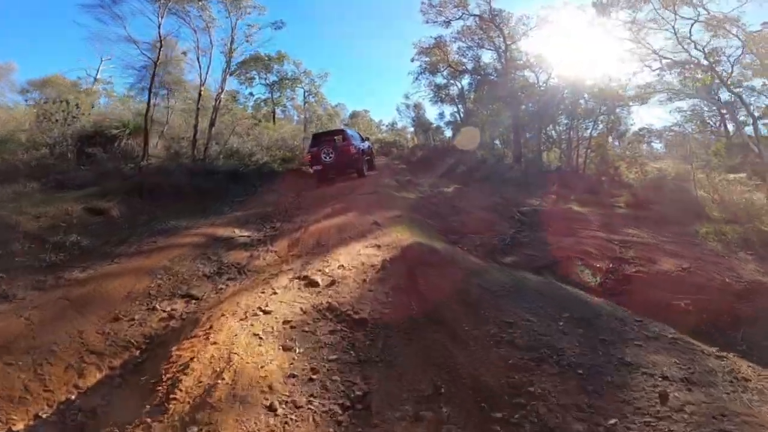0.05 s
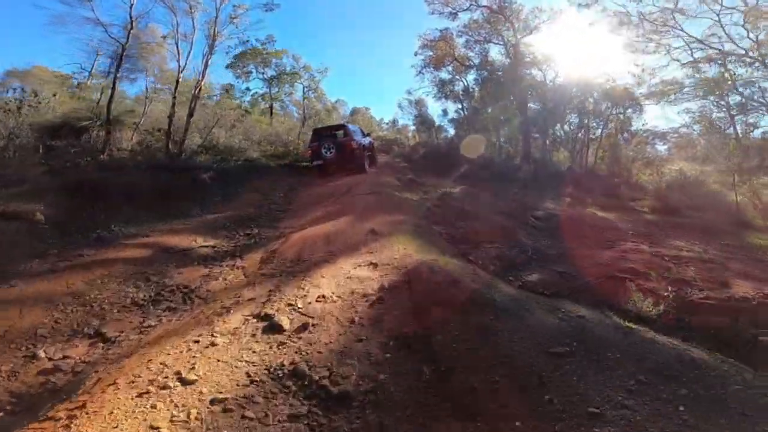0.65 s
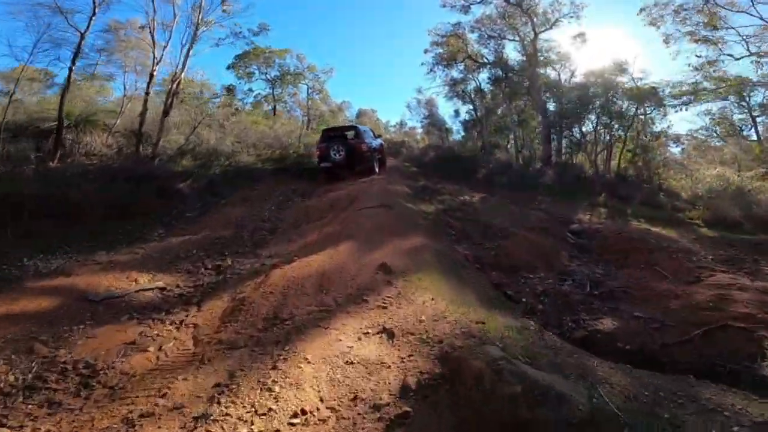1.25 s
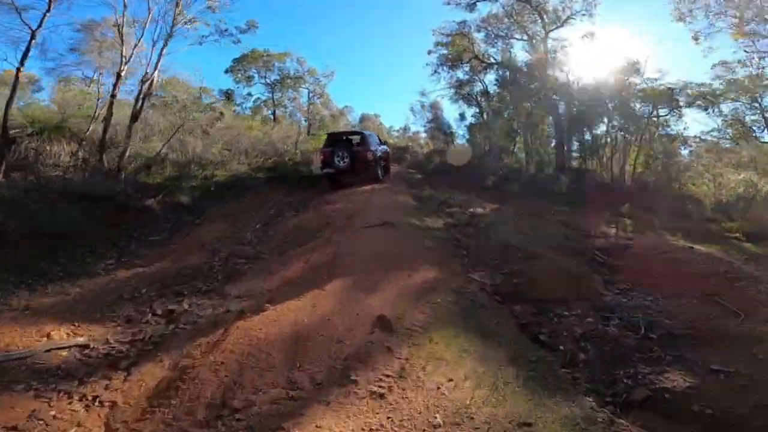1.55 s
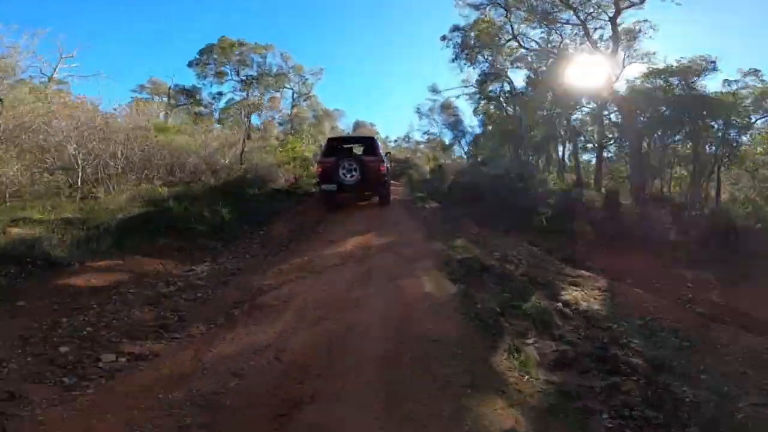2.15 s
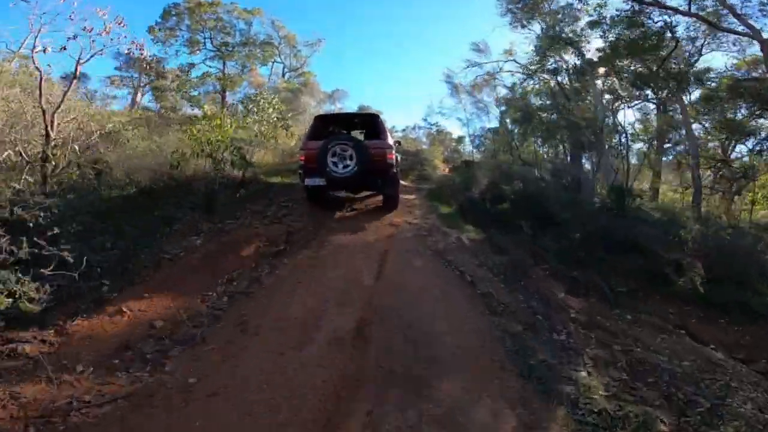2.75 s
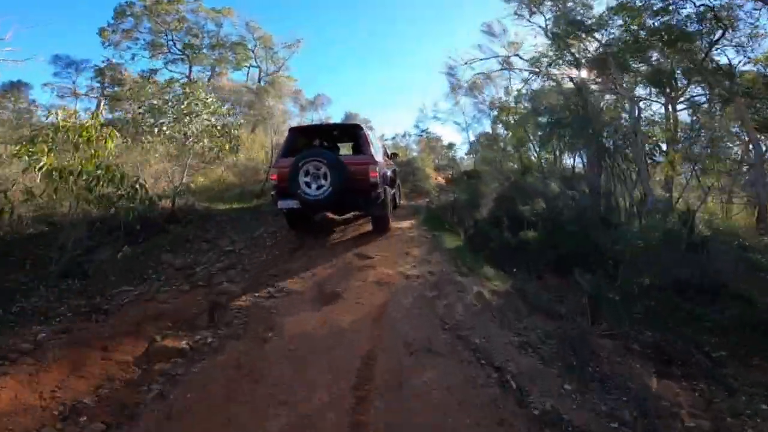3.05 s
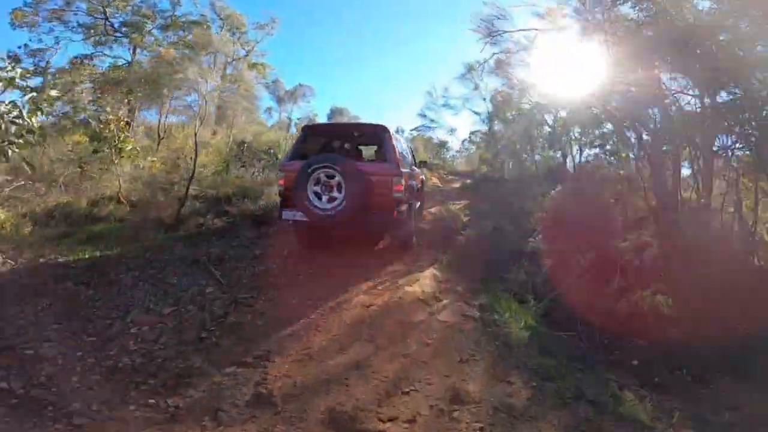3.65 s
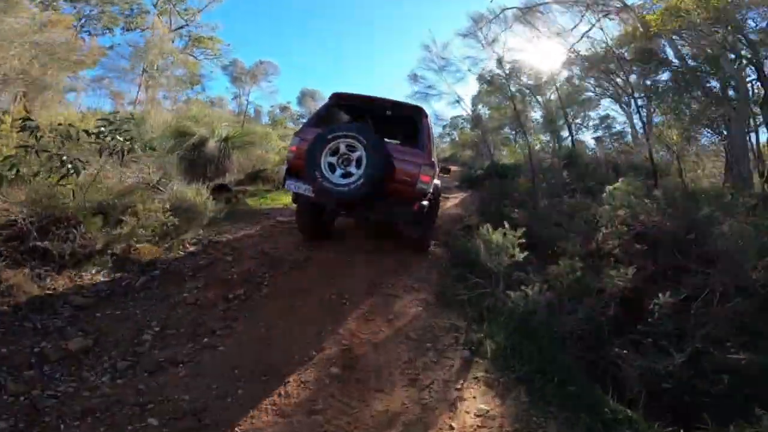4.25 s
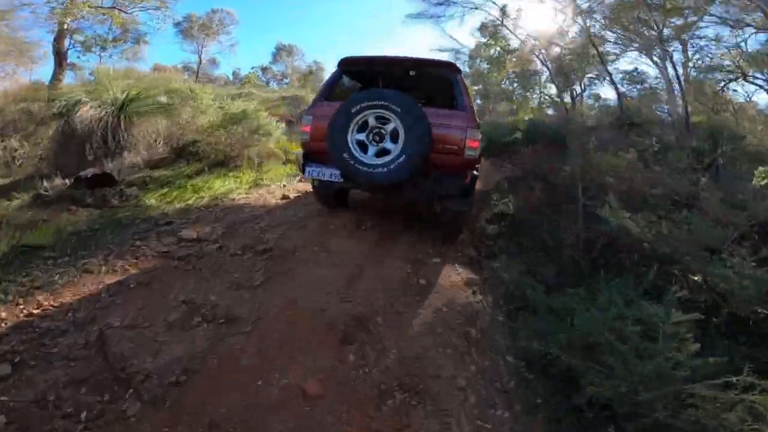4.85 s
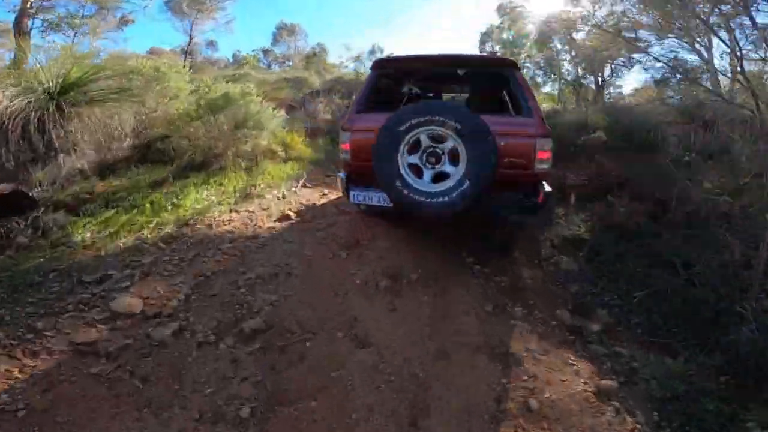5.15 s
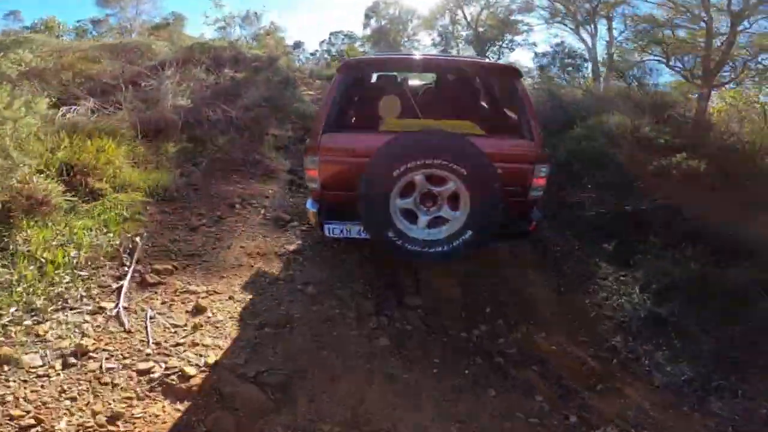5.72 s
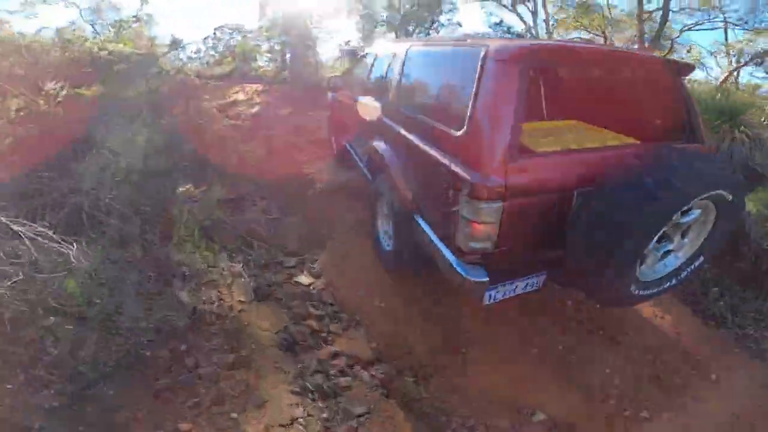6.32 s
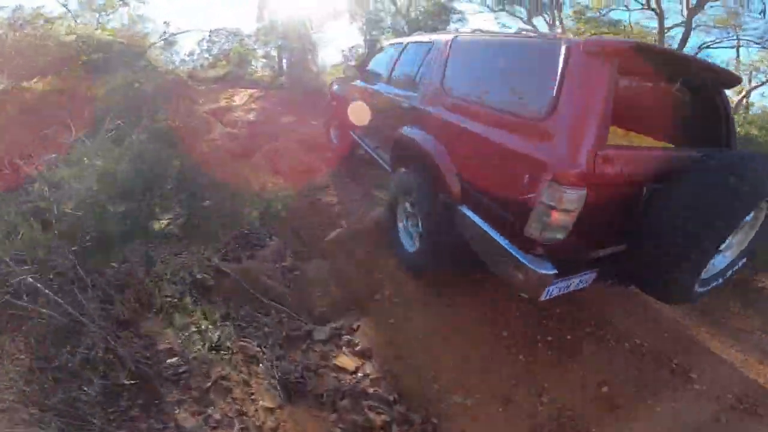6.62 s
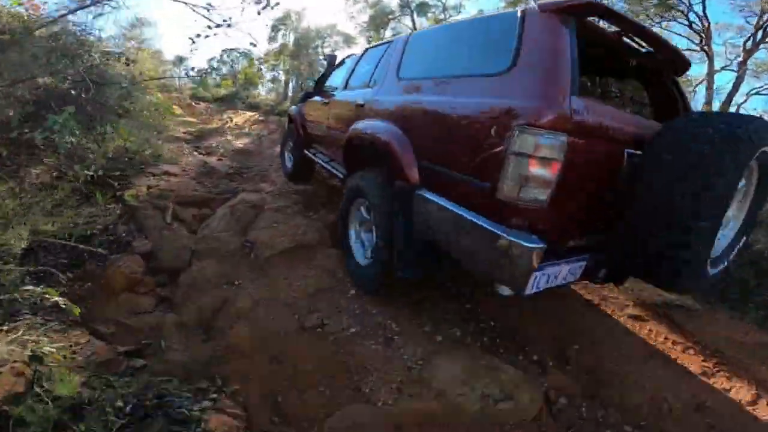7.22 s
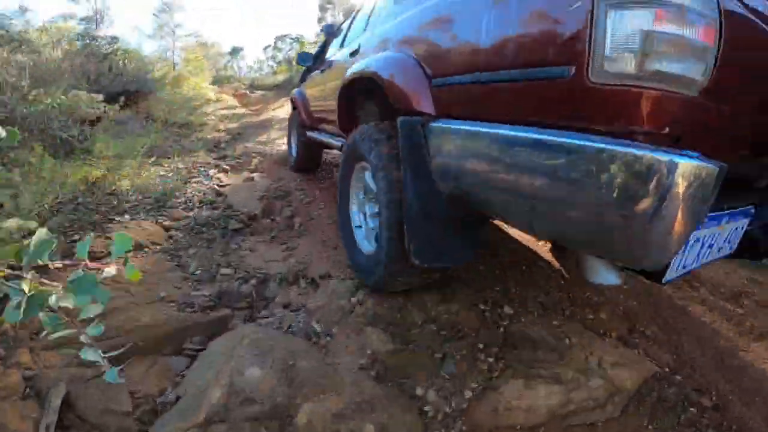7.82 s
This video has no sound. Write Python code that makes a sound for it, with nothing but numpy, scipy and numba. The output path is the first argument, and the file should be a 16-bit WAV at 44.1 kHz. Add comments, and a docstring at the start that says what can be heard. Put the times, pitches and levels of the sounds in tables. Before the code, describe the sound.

A diesel four-wheel drive climbs a rocky dirt track in the bush, heard from behind. Its exhaust drones low and sinks in pitch as the engine labours, with pulsing clatter, rattling fittings and a faint turbo whistle that runs down. Tyres crunch over gravel and the chassis knocks on ruts. Light wind brushes the microphone, which ends beside the rear wheel, where stones snap sharply.

```python
"""A rocky dirt track in the bush, the microphone catching up from behind with a diesel four-wheel drive.
The exhaust drones and sinks as the engine lugs uphill; its firings pulse in a low growl, clatter in the
block and rattle loose fittings, while the turbo whistles and runs down. Tyres drum and crunch over
gravel, stones snap and the chassis knocks on ruts. A little wind brushes the microphone, which starts
in mono, opens into stereo with a dry tick and ends up beside the rear wheel."""
import sys
import numpy as np
from scipy import signal
from scipy.fft import rfft, irfft, next_fast_len
from scipy.io import wavfile
from scipy.ndimage import uniform_filter1d
from numba import njit

SR = 44100
rng = np.random.default_rng(int(sys.argv[2]) if len(sys.argv) > 2 else 0)


def digitize_waveform(pressure):
    """Quantize a signal to 16-bit integers and store it at the path in sys.argv[1].

    Rows of a 2-D input are taken as channels; values are limited to [-1, 1].
    """
    field = np.atleast_2d(pressure).T
    bounded = np.clip(field, -1, 1)
    quanta = np.round(bounded * 32767).astype(np.int16)
    wavfile.write(sys.argv[1], SR, quanta)


N = 351918
TOP_HZ = 15300  # upper edge of the recorder's range

# tone of the engine: time_s, lumpiness (1 lumpier and more distant-sounding, 0 even)
ENGINE_TONE = [(0, 1), (1.1, 0.91), (2.9, 0.0084), (4.6, 0.19)]


def from_db(db):
    """Decibels to gain."""
    return 10 ** (np.asarray(db) / 20)


def curves(table):
    """The columns of a timed table, one value per sample."""
    times, *columns = np.transpose(table)
    return [np.interp(np.arange(N) / SR, times, column) for column in columns]


def unit(x):
    """Scale to rms 1."""
    return x / np.sqrt(np.mean(x ** 2))


def filtered(x, response):
    """Pass x through a response given as a function of frequency."""
    size = next_fast_len(x.shape[-1] + 4096)
    hz = np.maximum(np.arange(size // 2 + 1) * SR / size, 1)
    return irfft(rfft(x, size) * response(hz), size)[..., :x.shape[-1]]


def db_at(hz, points):
    """Read (frequency_hz, level_db) points along a logarithmic frequency axis."""
    point_hz, point_db = np.transpose(points)
    return np.interp(np.log(hz), np.log(point_hz), point_db)


def colour(x, points):
    """Shape x by (frequency_hz, level_db) points."""
    return filtered(x, lambda f: from_db(db_at(f, points)))


def ring(x, modes):
    """Let x excite (pitch_hz, width_hz, level_db) resonances of alternating sign."""
    return filtered(x, lambda f: sum((-1) ** k * from_db(db) / (1 + 1j * (f * f - hz * hz) / (f * width))
                                     for k, (hz, width, db) in enumerate(modes)))


def wander(rate_hz):
    """A smooth random curve of rms 1 that changes about rate_hz times a second."""
    steps = rng.standard_normal(2048)
    path = np.interp(np.arange(N) / SR * rate_hz, np.arange(len(steps)), steps)
    return unit(uniform_filter1d(path, int(SR / rate_hz / 2)))


def shifting_ring(x, modes, wander_db=0.7):
    """Ringing pitches whose balance wavers and follows the tone of the engine."""
    lumpiness, = curves(ENGINE_TONE)
    return sum((-1) ** k * ring(x, [(hz, width, db)])
               * from_db(lumpy_db * lumpiness + wander_db * wander(3.053))
               for k, (hz, width, db, lumpy_db) in enumerate(modes))


def grains(per_second, spread_db):
    """Two rows of random clicks, many small and a few large."""
    hits = rng.random((2, N)) < per_second / SR
    size = np.minimum(rng.exponential(size=(2, N)), 4)
    return unit(hits * from_db(spread_db * size) * rng.choice([-1, 1], (2, N)))


def sliding_band(hz, width_hz):
    """Two rows of noise in a band whose centre moves."""
    slow = filtered(rng.standard_normal((2, 2, N)), lambda f: 1 / (1 + (f / width_hz) ** 4))
    phase = 2 * np.pi * np.cumsum(hz) / SR
    return unit(slow[0] * np.cos(phase) + slow[1] * np.sin(phase))


def engine_pulse(hitch_s=0.02):
    """The firing rate and the running count of firings, with brief hitches in the drone."""
    # the engine lugs on the steep part, then surges and sags from rock to rock: time_s, firing_hz
    speed = [(0.0, 48.38), (1.21, 45.65), (1.55, 46.52), (1.68, 44.58), (2.01, 49.29), (2.4, 44.79),
             (2.45, 46.62), (3.28, 45.13), (4.26, 38.51), (4.29, 36.85), (5.05, 36.66), (5.16, 39.55),
             (5.66, 38.75), (5.78, 36.17), (6.05, 36.39), (6.14, 33.48), (6.38, 36.27), (6.52, 33.27),
             (6.68, 38.35), (7.32, 38.53), (7.43, 36.11), (7.77, 38.61), (7.98, 36.77)]
    # brief hitches, where the pulse slips part of a beat: time_s, slip_beats
    hitches = [(1.345, 0.26), (3.551, 0.1494), (4.291, 0.0509)]
    t = np.arange(N) / SR
    firing_hz, = curves(speed)
    slip = sum(beats * (1 + np.tanh((t - s) / hitch_s)) / 2 for s, beats in hitches)
    return firing_hz, np.cumsum(firing_hz) / SR - slip


def exhaust_levels(firing_hz):
    """Levels in dB of harmonics 1 to 4, sliding through the pipe's resonances with the engine speed."""
    # resonances of the exhaust pipe: frequency_hz, level_db
    pipe = [(35, -35), (45, -20.5), (67, -21.5), (74, -19.5), (80, -17), (98, -24.5), (110, -17.5),
            (128, -24), (137, -29), (147, -20), (160, -25), (176, -39), (195, -35)]
    # a blip at the foot of the slope, then short lifts between rocks: time_s, push_db (0 is steady)
    throttle = [(0, 1.5), (1.2, 1.5), (1.82, 0.3), (1.93, 2.5), (2.04, 2), (2.18, 1.9), (3.3, 2.5),
                (3.49, 3), (3.57, 1), (4.22, -3), (4.58, -2.1), (4.77, -4), (4.94, -4), (5.12, -3),
                (5.5, 1.5), (5.68, -3.5), (5.85, -0.8), (6.15, -3.2), (6.4, -0.5), (6.78, -0.5),
                (6.88, -2.5), (7.45, 0.9), (7.98, -0.6)]
    # how the throttle brightens the drone, one value per harmonic: db_per_push_db
    brightening = [0.28, 0.04, 1.94, 2.36]
    # tailpipe loudness along the climb: time_s, gain_db
    drone = [(0, -5), (1.3, -4), (2.1, -4.5), (2.7, -3), (3.6, -2.7), (4.05, -0.5), (4.45, -2.5), (5.3, -3),
             (6.0, 0.4), (6.15, 5.5), (6.35, 0.5), (7.0, -1), (7.2, -2.5), (7.98, -2)]
    # single harmonics swell or dip for a moment: centre_s, harmonic_number, gain_db, half_width_s
    swells = [(1.357, 2, 6.5, 0.035), (2.95, 1, 1.5, 0.37), (3.55, 2, -15, 0.023), (3.631, 3, -11, 0.061),
              (4.45, 4, 5.5, 0.12), (4.603, 3, 9, 0.08), (4.97, 3, 10, 0.12), (5.115, 4, -6, 0.027),
              (5.217, 4, 5.5, 0.25), (5.676, 4, -11, 0.024), (6.163, 2, 2, 0.039), (6.877, 4, -3.5, 0.17),
              (7.166, 1, 4, 0.34), (7.48, 3, -4, 0.11), (7.73, 3, 3, 0.067), (7.898, 3, 6, 0.074)]
    t = np.arange(N) / SR
    (push_db,), (drone_db,) = curves(throttle), curves(drone)
    levels_db = []
    for harmonic, gain in enumerate(brightening, start=1):
        swell_db = sum(db * np.exp(-((t - s) / half_width) ** 2)
                       for s, number, db, half_width in swells if round(number) == harmonic)
        pipe_db = db_at(harmonic * firing_hz, pipe)
        levels_db.append(pipe_db + drone_db + gain * push_db + swell_db + wander(9.1))
    return levels_db


def exhaust(cycle, firing_hz, lope_db=-27, lumpy_lope_db=8):
    """One thud per firing, of which the silencer leaves four strong harmonics; lumpiest at the start."""
    # ground and bush smear the thuds into a rumble; in the clear they are chugs: time_s, spread_rad
    smear = [(0, .65), (1.5, .65), (1.7, .95), (4.22, 1.05), (4.42, .15), (5.4, .25), (5.9, 0), (6.7, 0),
             (7.5, .1)]
    (spread,), (lumpiness,) = curves(smear), curves(ENGINE_TONE)
    levels_db = exhaust_levels(firing_hz)
    centre = (len(levels_db) - 1) / 2
    thuds = np.zeros(N)
    for k, db in enumerate(levels_db):
        shift = spread * (1 + (k - centre) ** 2)
        thuds -= np.sqrt(2) * from_db(db) * np.cos(2 * np.pi * (k + 1) * cycle + shift)
    # no two firings are equally strong, and alternate cylinders differ
    uneven = (0.025 + 0.05 * lumpiness) * wander(45)
    lope = from_db(lope_db + lumpy_lope_db * lumpiness) * np.cos(np.pi * cycle)
    return thuds * (1 + uneven + lope)


def exhaust_overtones(cycle, firing_hz):
    """Weak harmonics 5 to 11 slide through the silencer's resonances, each wavering on its own."""
    # what the silencer lets through: frequency_hz, gain_db
    silencer = [(178, -5), (200, 0), (222, -10), (275, -10), (335, -6), (385, -7), (450, -17)]
    # leak past the silencer along the climb: time_s, level_db
    leak = [(0, -33.5), (3.2, -40.5), (4.3, -43), (4.9, -45.5), (5.302, -40), (5.68, -34.5), (6.0, -32.5),
            (6.2, -48), (7.03, -35.5), (7.17, -36), (7.98, -41)]
    hz, db = np.transpose(silencer)
    tones = np.zeros(N)
    for harmonic in range(5, 12):
        level_db = np.interp(harmonic * firing_hz, hz, db) + 2 * wander(3.9)
        tones += from_db(level_db) * np.cos(2 * np.pi * (harmonic * cycle + rng.random()))
    return tones * from_db(curves(leak)[0])


def combustion(cycle, repeat_share, depth, decay_firings):
    """A rattling burst per firing; a share of it comes back alike with every round of four cylinders."""
    size = 2048
    place = (cycle / 4 % 1) * size
    pattern = np.array([np.interp(place, np.arange(size), rng.standard_normal(size)) for _ in range(2)])
    noise = np.sqrt(repeat_share / 2) * pattern + np.sqrt(1 - repeat_share) * grains(1500, spread_db=2.5)
    return noise * (1 + depth * np.exp(-(cycle % 1) / decay_firings))


def engine_growl(cycle):
    """A low, ringing growl that pulses with the firings."""
    # low ringing pitches of the pulsing growl: pitch_hz, width_hz, level_db, extra_when_lumpy_db
    pitches = [(200.6, 27, -6.5, 0.5), (273, 33, -8.5, 8), (331.7, 36, -4, 0), (379, 35, -1, 0),
               (431, 33, -2.5, -4)]
    # growl along the climb: time_s, level_db
    loudness = [(0, -39), (1.0, -41), (1.55, -33.5), (1.85, -40.5), (2.5, -31), (3.3, -30.5), (3.7, -35),
                (4.1, -37), (4.35, -45.5), (5.0, -33.5), (5.35, -33), (5.85, -31), (6.15, -37.5),
                (6.45, -32.5), (7.15, -34.5), (7.98, -27)]
    pulses = shifting_ring(combustion(cycle, repeat_share=0.55, depth=1.3, decay_firings=0.25), pitches)
    growl = colour(pulses, [(90, -6.5), (200, 5), (450, -11.5), (900, -18), (3000, -37)])
    return unit(growl) * from_db(curves(loudness)[0] + 1.42 * wander(11))


def diesel_clatter(cycle):
    """Diesel knock clatters with each firing, now harder, now softer."""
    # narrow steady ringing that colours the clatter: pitch_hz, width_hz, level_db, extra_when_lumpy_db
    pitches = [(718, 37, 9, -4.5), (832.5, 40, 9.5, -4.5), (929, 31, 2, 3), (1030.6, 23, 3.5, -0.5),
               (1150, 55, -3, -14), (1417, 110, -9, 0.5), (1683, 170, -8, 4), (1900, 120, -17.5, 8),
               (2330, 25, -15, -5)]
    # clatter along the climb: time_s, level_db
    loudness = [(0, -41), (1.4, -38.5), (2.15, -43.5), (3.45, -35), (4.1, -39), (4.351, -41),
                (4.801, -39.5), (5.55, -46.5), (6.15, -42.5), (6.6, -40), (7.4, -42), (7.75, -39)]
    knock = shifting_ring(combustion(cycle, repeat_share=0.69, depth=1.0, decay_firings=0.17), pitches)
    clatter = colour(knock, [(250, -14.5), (700, -3), (2500, -3), (6000, -20)])
    return unit(clatter) * from_db(curves(loudness)[0] + 1.8 * wander(7.1) + 1.5 * wander(40))


def fittings_rattle(cycle, decay_firings=0.25):
    """Loose metal fittings chatter in separate taps, hardest just after a firing."""
    # their resonances: pitch_hz, width_hz, level_db
    fittings = [(1126, 14, 5.5), (1237, 51, 0), (1662, 46, -10), (1786, 120, -10)]
    # rattle along the climb: time_s, level_db
    loudness = [(0, -54), (1.2, -48), (2.2, -53), (3.1, -42.5), (4.1, -58), (5.5, -52.5), (6.8, -49.5),
                (7.3, -43), (7.98, -44.5)]
    taps = grains(170, spread_db=2.5) * np.exp(-(cycle % 1) / decay_firings)
    return unit(ring(taps, fittings)) * from_db(curves(loudness)[0])


def turbo(flutter_hz=26, drift_hz=22, trim_db=-3):
    """On boost, a thin wavering whistle inside a narrow band of air; run down, only a diffuse rush."""
    # the turbo runs down as the engine lugs: time_s, pitch_hz, level_db
    run_down = [(0, 6200, -62), (1.0, 6060, -59.5), (1.5, 6080, -58), (1.85, 6060, -64), (2.05, 6270, -68),
                (2.5, 6030, -61), (2.95, 5850, -65), (3.28, 5890, -63.5), (3.55, 5530, -68),
                (3.75, 5350, -81), (4.6, 4300, -74.5), (5.4, 4480, -67.5), (7.98, 4650, -78)]
    hz, db = curves(run_down)
    wavering_hz = hz + flutter_hz * wander(150) + drift_hz * wander(16)
    tone = np.sqrt(2) * np.sin(2 * np.pi * np.cumsum(wavering_hz) / SR)
    whistle = unit(tone + sliding_band(hz, width_hz=150))
    rush = sliding_band(hz * (1 + 0.011 * wander(5)), width_hz=200)
    flicker_db = 2.4 * wander(38)
    boost = np.interp(hz, [4700, 5500], [0, 1])
    return from_db(db + flicker_db + trim_db) * (np.sqrt(boost) * whistle + np.sqrt(1 - boost) * rush)


def tread_rumble(cycle):
    """The driven tyres drum on the hard ground."""
    # resonances of tyres, wheel wells and rims: pitch_hz, width_hz, level_db
    wheels = [(445, 63, -1.5), (534, 25, 6), (640, 65, 2), (1180, 66, -3.5)]
    # rumble along the climb: time_s, level_db
    loudness = [(0, -39.5), (2.25, -44), (3.6, -41.5), (4.101, -42), (4.4, -45.5), (5.1, -47), (5.35, -40),
                (6.1, -43.5), (6.35, -39.5), (7.1, -36), (7.65, -33.5), (7.98, -41)]
    drum = ring(combustion(cycle, repeat_share=0.66, depth=0.27, decay_firings=0.54), wheels)
    rumble = colour(drum, [(150, -12.5), (420, 6.5), (700, 0.5), (1400, -14.5), (4000, -36)])
    return unit(rumble) * from_db(curves(loudness)[0] + 2 * wander(21))


def gravel(near, mono, grit_db=-13, hiss_db=-25, near_db=8, mono_db=6.5):
    """Tyres crush dirt and grit in spurts; a fine hiss on top is louder close up and in mono."""
    # spectrum of crushed gravel: frequency_hz, level_db
    crunch_colour = [(300, -21.5), (600, 5.5), (1300, 5), (1800, 3), (2200, 2), (2800, -1), (4000, -13.5),
                     (5500, -21), (8000, -27.5), (12000, -56.5), (16000, -42.5)]
    # spectrum of the fine hiss: frequency_hz, level_db
    hiss_colour = [(2500, -23), (4500, 1.5), (6500, -1.5), (7900, -3), (8400, 3), (8950, 0), (9400, -3),
                   (11000, -9.5), (15000, -29.5)]
    # crunch along the climb: time_s, level_db
    loudness = [(0, -46), (1.55, -43.5), (1.75, -46), (2.7, -42.5), (4.3, -46.5), (6.2, -48.5),
                (6.7, -44.5), (6.92, -37.5), (7.3, -41.5), (7.98, -44)]
    crush = grains(9000, spread_db=0.5) + from_db(grit_db) * grains(650, spread_db=4.5)
    crunch = unit(colour(crush, crunch_colour)) * from_db(1.16 * wander(22))
    hiss = unit(colour(grains(13000, spread_db=2.5), hiss_colour)) * from_db(1.6 * wander(54))
    hiss *= from_db(hiss_db + near_db * near + mono_db * mono)
    return (crunch + hiss) * from_db(curves(loudness)[0])


def wind():
    """Low buffeting on the microphone, the same left and right."""
    # a gust now and then: time_s, level_db
    gusts = [(0, -34), (1.0, -32), (1.3, -25), (1.45, -30), (1.7, -28), (2.0, -32), (3.0, -30), (3.55, -28),
             (4.2, -34), (4.35, -25), (4.55, -34), (7.5, -37), (7.98, -30)]
    spectrum = [(10, -32.5), (26, -2), (45, -4), (90, -4), (170, -9), (300, -26.5), (1000, -70)]
    buffeting = colour(rng.standard_normal(N), spectrum)
    return unit(buffeting) * from_db(curves(gusts)[0] + 2 * wander(7))


def bursts(events, width_ratio, attack_share, spiky_db):
    """Each burst is a quick cluster of uneven impacts that rings a broad resonance and dies away."""
    out, t = np.zeros((2, N + SR)), np.arange(SR // 5) / SR
    for start_s, db, hz, decay_s in events:
        envelope = (1 - np.exp(-t / (attack_share * decay_s))) * np.exp(-t / decay_s)
        impacts = rng.standard_normal((2, len(t))) * from_db(spiky_db * rng.standard_normal(len(t)))
        burst = ring(impacts * envelope, [(hz, width_ratio * hz, 0)])
        burst = ring(burst, [(hz, 2 * width_ratio * hz, 0)])
        # the give of rubber and dirt takes the top off
        burst = filtered(burst, lambda f: 1 / (1 + 1j * f / (0.84 * hz)) ** 2)
        start = int(start_s * SR)
        out[:, start:start + len(t)] += from_db(db) * unit(burst) * np.sqrt(decay_s / t[-1])
    return out[:, :N]


def knocks():
    """The chassis knocks on ruts and rocks; the thud at 1.584 s is the low body of the lone dry tick."""
    # dull knocks: start_s, level_db, centre_hz, decay_s
    thuds = [(.131, -40, 610, 0.011), (.369, -33, 560, 0.011), (1.271, -27.5, 730, 0.0049),
             (1.41, -24.5, 780, 0.0038), (1.44, -29.5, 950, 0.0059), (1.584, -27, 752.6, 0.0053),
             (1.912, -28, 590, 0.019), (2.649, -28, 700, 0.0045), (3.052, -23, 640, 0.0022),
             (3.086, -33, 1330, 0.0063), (3.377, -33, 850, 0.015), (3.854, -24, 400, 0.0036),
             (3.859, -15, 414, 0.005), (4.016, -36, 755, 0.012), (4.129, -30.5, 650, 0.0077),
             (4.575, -27, 339.3, 0.016), (6.07, -42, 910, 0.0057), (6.247, -40, 1200, 0.0091),
             (6.32, -33, 400, 0.047), (6.435, -32, 425, 0.023), (6.49, -39, 687, 0.0076),
             (6.615, -34, 394, 0.036), (6.851, -27.5, 790, 0.0082), (6.951, -27, 705, 0.011),
             (7.063, -35, 710, 0.0084), (7.127, -30, 754, 0.0073), (7.687, -31, 515, 0.0073),
             (7.714, -23.5, 630, 0.018)]
    return bursts(thuds, width_ratio=0.96, attack_share=0.12, spiky_db=4)


def stone_snaps(decay_s=0.013):
    """Stones snap under the tyres in bright, spiky bursts."""
    # snapping stones: start_s, level_db, centre_hz
    stones = [(0.734, -41, 2640), (1.054, -51, 7500), (1.269, -36.5, 1880), (1.272, -57, 11500),
              (1.622, -39.5, 2580), (2.274, -58, 6600), (2.336, -41.5, 3600), (3.855, -36.5, 1900),
              (4.137, -53, 4340), (4.428, -54.5, 5000), (4.632, -58.5, 6460), (4.69, -42.5, 2670),
              (4.8, -56, 8700), (6.872, -33.5, 1900), (6.908, -42.5, 1600), (6.955, -30, 1460),
              (6.982, -37.5, 1600), (7.065, -34, 1590), (7.124, -33, 2050), (7.33, -37, 2240),
              (7.702, -40, 2200), (7.849, -41, 2270), (7.955, -45.5, 3380)]
    snaps = [(start_s, db, hz, decay_s) for start_s, db, hz in stones]
    return bursts(snaps, width_ratio=0.94, attack_share=0.15, spiky_db=7)


def click(start_s=1.584, level_db=-11, decay_s=0.0001):
    """A lone dry tick, dead centre, as the stereo opens."""
    t = (np.arange(N) - int(start_s * SR)) / SR
    return from_db(level_db) * (t >= 0) * np.exp(-np.abs(t) / decay_s)


def tyre_scrape():
    """A tyre grinds over a rock, in spurts, its pitch sinking."""
    # course of the scrape: time_s, centre_hz, level_db
    grind = [(5.75, 1294, -80.5), (5.85, 1285, -51), (5.94, 1197, -43), (6.1, 969, -40), (6.22, 763, -39),
             (6.28, 702, -51), (6.36, 695, -74)]
    hz, db = curves(grind)
    return sliding_band(hz, width_hz=260) * from_db(db + 2.6 * wander(45))


def chip_cracks(centre_hz=2800, width_hz=4500, decay_s=0.0016, trim_db=-3):
    """Chips of rock break under the rear wheel, close to the microphone, each with one dry tick."""
    # breaking chips: start_s, level_db
    chips = [(6.8746, -37), (6.909, -35), (7.1247, -31), (7.3315, -40)]
    out, t = np.zeros((2, N + SR)), np.arange(SR // 50) / SR
    for start_s, db in chips:
        mode = [(centre_hz * 2 ** rng.uniform(-0.5, 0.5), width_hz, 0)]
        fracture = rng.standard_normal((2, len(t))) * np.exp(-t / decay_s)
        tick = ring(ring(fracture, mode), mode)
        start = int(start_s * SR)
        out[:, start:start + len(t)] += from_db(db + trim_db) * tick / np.abs(tick[0]).max()
    return out[:, :N]


@njit
def highpass(x, hz):
    """State-variable high-pass whose corner may move every sample."""
    y, band, low = np.empty(len(x)), 0., 0.
    for i in range(len(x)):
        g, damping = np.tan(np.pi * min(hz[i] / SR, 0.45)), np.sqrt(2.)
        v = (band + g * (x[i] - low)) / (1 + g * (g + damping))
        y[i] = x[i] - damping * v - (low + g * v)
        band, low = 2 * v - band, low + 2 * g * v
    return y


def mono_share(until_s=1.48, opening_s=0.14):
    """1 while the microphone is mono, then dying away to 0."""
    return np.exp(-np.maximum(np.arange(N) / SR - until_s, 0) / opening_s)


def microphone(sound, near, mono, bass_far_hz=400, bass_near_hz=190):
    """A close pair of ports: stereo opens from the treble down and widens close up; bass stays mono."""
    # colour of the microphone housing: frequency_hz, gain_db
    housing = [(2030, -1.5), (2110, -1.5), (2230, -6), (2300, 2), (2400, -3), (2550, 1), (2740, -1.5),
               (3050, 1.5), (3180, -0.5), (3400, 2.5)]
    # stereo width across the spectrum: frequency_hz, side_gain_db
    width = [(250, -41), (500, -9.5), (1000, -0.5), (2000, 0), (4000, 2.5), (8000, 4.5), (14000, 5.5)]
    mid, scattered = colour(sound, housing)
    # left and right differ by the direct sound a quarter cycle on and by sound off the bush
    direct_share = 0.17 + 0.35 * near
    side = direct_share * filtered(mid, lambda f: 1j) + np.sqrt(1 - direct_share ** 2) * scattered
    side = colour(side, width)
    # filtered forwards and backwards, so that the image stays centred
    mono_below_hz = bass_far_hz + (bass_near_hz - bass_far_hz) * near + TOP_HZ * mono
    side = highpass(side, mono_below_hz)
    side = highpass(side[::-1].copy(), mono_below_hz[::-1].copy())[::-1]
    side = side * from_db(-6 + 5 * near - 20 * mono ** 2)
    return np.array([mid + side, mid - side])


def scene():
    """Engine and track spread across the microphone; tailpipe, wind and click sit in the centre."""
    # microphone position: time_s, closeness (0 far behind, 1 beside the rear wheel)
    closeness = [(0, 0.19), (3, 0), (5.502, 0.19), (6.198, 0.6), (7.98, 1)]
    near, = curves(closeness)
    mono = mono_share()
    firing_hz, cycle = engine_pulse()
    tailpipe = exhaust(cycle, firing_hz) + exhaust_overtones(cycle, firing_hz)
    engine = engine_growl(cycle) + diesel_clatter(cycle) + fittings_rattle(cycle) + turbo()
    track = tread_rumble(cycle) + gravel(near, mono) + tyre_scrape()
    impacts = stone_snaps() + knocks() + chip_cracks()
    return microphone(engine + track + impacts, near, mono) + tailpipe + wind() + click()


def record(dry, fade_s=0.008):
    """The recorder eases in and out and cuts the top."""
    t = np.arange(N) / SR
    ease = np.sin(np.pi / 2 * np.clip(np.minimum(t, t[-1] - t) / fade_s, 0, 1)) ** 2
    top_cut = signal.ellip(8, 0.2, 70, TOP_HZ, fs=SR, output="sos")
    return signal.sosfilt(top_cut, dry * ease)


dry = scene()
out = record(dry)
digitize_waveform(out)
```